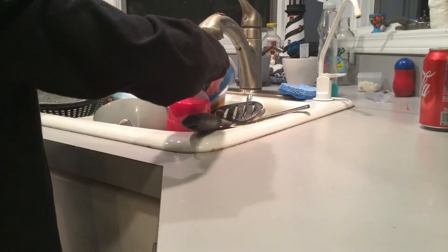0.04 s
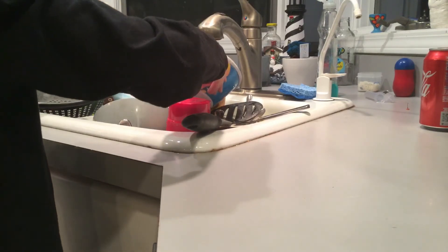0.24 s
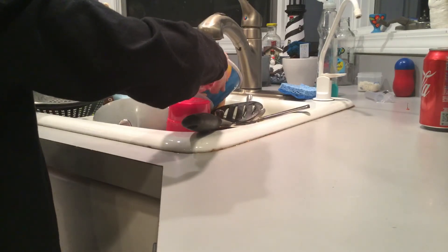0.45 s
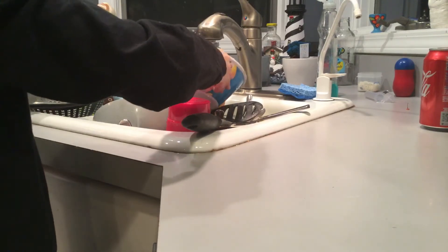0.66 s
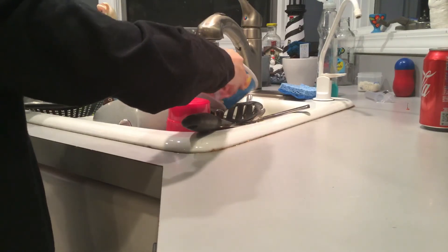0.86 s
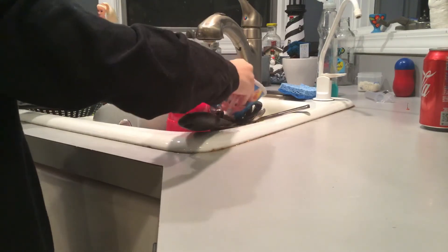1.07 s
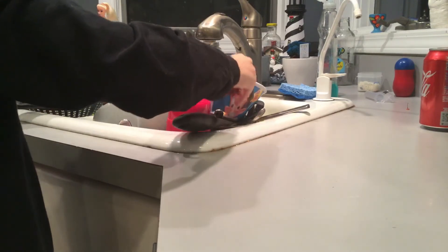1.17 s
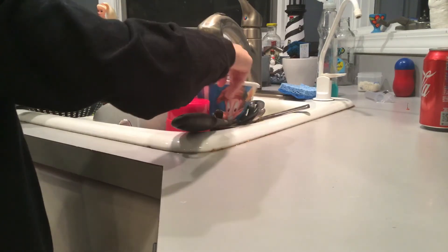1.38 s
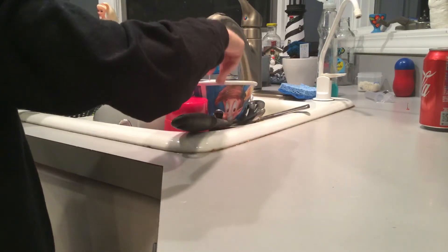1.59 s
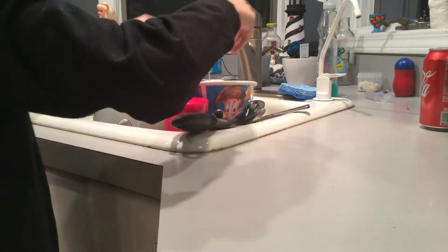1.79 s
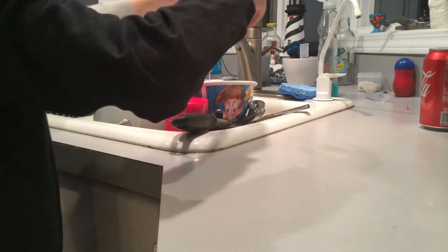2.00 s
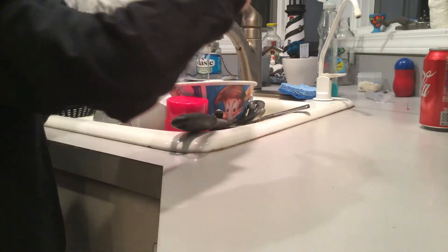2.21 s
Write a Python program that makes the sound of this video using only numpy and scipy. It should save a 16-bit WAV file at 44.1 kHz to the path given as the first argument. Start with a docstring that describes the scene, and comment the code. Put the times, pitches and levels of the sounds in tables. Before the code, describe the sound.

A dish clacks sharply in a kitchen sink at about 0.2 seconds, the loudest sound, ringing briefly. Faint ticks of slipping edges follow, and utensils clink lightly around 0.8 to 1.1 seconds. From 1.2 seconds a plastic tub rubs along the rim, then settles with hollow, damped thumps around 1.5 to 1.6 seconds. Low hum and hiss continue throughout in the small, hard room, heard from a step away.

```python
"""Low hum, hiss and a few faint ticks in a hard, small kitchen, then one sharp clack: a hand shifts
dishes in the sink. The clack is a dish struck in quick contacts, each a crack plus ringing modes.
Thin edges slip and tick, utensils chatter and clink. A plastic tub rubs along the rim and is set
down with hollow, hand-damped thumps. The microphone is a step away on the counter."""
import sys
import numpy as np
from scipy import signal
from scipy.fft import rfft, irfft
from scipy.io import wavfile
from scipy.ndimage import uniform_filter1d

SR = 44100
rng = np.random.default_rng(int(sys.argv[2]) if len(sys.argv) > 2 else 0)


def transcribe(signal):
    """Save signal, clipped to [-1, 1], as a 16-bit WAV file at the path in sys.argv[1]."""
    frames = np.atleast_2d(signal).T
    limited = np.clip(frames, -1, 1)
    pcm = np.round(limited * 32767).astype(np.int16)
    wavfile.write(sys.argv[1], SR, pcm)


N = 99225
EVENT_SAMPLES, LEAD_SAMPLES = 16384, 512  # one contact; lead-in before its onset
EVENT_T_S = np.maximum(np.arange(EVENT_SAMPLES) - LEAD_SAMPLES, 0) / SR

# Hiss and rumble spectrum: f/Hz, relative density/dB
AIR_SPECTRUM = [(15, -11), (25, 5), (65, 0.5), (172, -8.5), (288, -7), (410, -14.5), (746, -19), (854, -26),
                (3910, -32), (5880, -33.5), (12200, -32), (15200, -34.5), (16500, -45)]
# Hum tones: f/Hz, rms level/dB, level waver/dB, pitch waver/Hz
HUM_TONES = [(54, -63.5, 0.5, 1.17), (123.6, -66.5, 3.5, 6.7)]
# Room decay: f/Hz, t60/s
ROOM_DECAY = [(60, 0.32), (250, 0.23), (1000, 0.53), (3000, 0.53), (6000, 0.41), (10000, 0.21),
              (16000, 0.175)]
# Room echo strength: f/Hz, level/dB
ROOM_LEVELS = [(60, -15), (300, 2.5), (1000, 1), (3000, 2.5), (8000, 0), (16000, 1)]
# Edge slips: t/s, peak level/dB, centre f/Hz, width/oct, t60/s, relative broadband level/dB
EDGE_TICKS = [(0.066, -57, 13100, 0.11, 0.03, -26), (0.093, -52.5, 3700, 0.12, 0.12, -12),
              (0.114, -51.5, 12800, 0.28, 0.038, 7), (0.42, -43.5, 5170, 0.63, 0.029, -24),
              (0.463, -41, 8900, .15, 0.076, -21), (.471, -39, 9200, 0.12, 0.03, -11),
              (0.528, -52, 13200, .4, .05, -8), (0.567, -54, 5850, 0.17, 0.036, -10),
              (0.671, -44.5, 8700, 0.13, 0.064, -8), (0.673, -42, 15020, 0.13, .05, -14),
              (0.702, -39, 9140, 0.097, 0.018, -20), (0.705, -39, 15500, 0.059, 0.04, -2),
              (.800, -50, 15400, .15, 0.044, -26), (0.832, -38, 14700, 0.25, 0.077, -7.5),
              (0.85, -46, 11600, 0.072, 0.14, -20), (0.883, -41, 8550, 0.06, 0.057, -16),
              (0.927, -43, 10800, 0.11, 0.044, -18), (0.931, -40.5, 9400, 0.11, 0.071, -14),
              (0.947, -43, 9200, 0.057, 0.028, -11), (0.951, -49, 5660, 0.26, 0.05, -19),
              (0.991, -34, 9000, 0.12, 0.023, -7), (1.164, -48, 4030, 0.26, .06, -7.5),
              (1.221, -53, 8360, 0.12, 0.033, -9), (1.3, -51, 8200, 0.05, 0.19, -12),
              (1.304, -51, 11800, .1, .12, -10), (1.485, -63, 13600, .2, .06, -17),
              (1.521, -34, 10300, 1, 0.1, -16), (1.822, -55, 10210, 0.23, 0.031, -8),
              (1.785, -58.5, 9180, .12, 0.044, -9.5), (1.878, -56, 12000, .25, 0.069, -10),
              (1.914, -58, 12500, 0.18, 0.047, 0), (2.101, -56.5, 12000, 0.15, 0.032, -31),
              (2.158, -40, 13230, .12, 0.022, -28.5)]
# Tub rubbing the rim: t/s, peak level/dB, centre f/Hz, width/oct, t60/s
RIM_SCRAPES = [(1.225, -46.5, 2100, 1, 0.078), (.931, -46, 1600, 0.72, 0.13),
               (1.275, -44.5, 2840, 0.83, 0.3), (1.2, -51, 2040, 0.29, 0.18), (1.2, -52.5, 3600, 0.1, 0.51),
               (1.42, -57, 3600, .3, 0.66), (1.915, -54.5, 3000, .25, 0.095),
               (1.522, -37, 3690, 0.39, 0.21), (1.60, -41, 617, 0.68, 0.46), (1.75, -59, 1850, 0.19, 0.99)]
# Utensil contacts: t/s, peak level/dB, excitation f/Hz
UTENSIL_HITS = [(0.0149, -58, 2620), (0.84, -50, 4100), (0.854, -43, 3010), (0.861, -54, 3550),
                (.858, -48, 4100), (.875, -46.5, 3050), (0.931, -51, 1350), (0.933, -49, 4100),
                (.943, -56.5, 1340), (0.954, -47, 5250), (0.963, -51, 2950), (0.996, -41.5, 4060),
                (0.996, -43, 3100), (.995, -47, 1470), (1.009, -58.5, 4450), (1.009, -49, 3500),
                (1.042, -52, 3080), (1.043, -58, 1467), (1.054, -57, 3730), (1.083, -55.5, 3130),
                (1.101, -52, 1630), (1.356, -55, 2540), (1.372, -51, 2540), (1.41, -59, 2530),
                (1.454, -60.5, 2500), (1.469, -53, 2480), (1.598, -37, 1760)]
# Utensil modes: f/Hz, relative level/dB, t60/s
UTENSIL_MODES = [(1340, 0, 0.034), (1450, 0, 0.038), (1597, 0, .03), (1800, 0, 0.019), (2525, 0, 0.062),
                 (2957, 0, 0.055), (3057, -3, 0.048), (3560, -4, 0.044), (3650, 0, .04), (4075, 2, 0.017),
                 (4470, -3, 0.048), (5230, 0, 0.03)]
# Tub contacts: t/s, peak level/dB, excitation f/Hz, rattle gain/dB,
# t60/ratio, pitch under grip/ratio, onset detuning/fraction
TUB_HITS = [(.221, -27, 136, -8.5, 0.3, 1.02, 0.14), (.244, -34.5, 340, -14, 1.44, 0.96, 0.11),
            (.30, -41.5, 119.6, -16, 0.66, 0.94, 0.16), (0.383, -46.5, 118, -28, 0.83, 1.1, 0.091),
            (.545, -47, 120, -42, 0.8, 1.26, -0.013), (0.782, -52, 128, -23, 0.53, 1.01, 0.0083),
            (.989, -47, 118, -22, 0.56, 0.87, 0.17), (1.171, -46, 397, -1.5, 0.27, 1.08, 0.055),
            (1.223, -44.5, 503, -5, 0.29, 1.13, -0.0057), (1.271, -35.5, 182, -10, 0.49, 1.006, 0.13),
            (1.3, -46, 297, -6.5, 0.41, .95, 0.036), (1.438, -39, 277, -14, 0.2, 1.02, 0.12),
            (1.4957, -26, 340, -22, 1.55, 0.91, .27), (1.529, -26.5, 346, -12.5, 0.72, 1.1, -0.07),
            (1.536, -36, 140, 0, 0.49, 0.91, 0.041), (1.557, -34.5, 336.4, -7, 0.48, .98, 0.087),
            (1.567, -34, 123, -11, 0.63, 1.1, 0.15), (1.582, -38.5, 400, -10.5, 0.47, 1, 0.019),
            (1.598, -40, 425, -5.5, 0.56, 1.03, -0.00045), (1.62, -38.5, 344, -13.5, 0.25, 1.01, 0.055)]
# Tub modes: f/Hz, relative level/dB, t60/s
TUB_MODES = [(115.6, 1, 0.082), (186, -12.5, 0.21), (277, -13, 0.19), (322, -1.5, 0.16),
             (442.6, -14.5, 0.1), (609, -9.5, 0.15), (770, -12.5, 0.31), (970, -5.5, 0.039),
             (1094, -11.5, .08)]
# Dish contacts: t/s from clack onset, peak level/dB, excitation f/Hz
DISH_HITS = [(0, -18, 10950), (.0005, -27, 1250), (.0026, -16.5, 8500), (.005, -17, 9100),
             (.0062, -17.5, 2120), (.0088, -13.5, 5600), (.009, -16.5, 2100), (0.0172, -16, 2850),
             (.018, -25.5, 650), (.028, -21.5, 4850), (.045, -26, 3100)]
# Dish modes: f/Hz, relative level/dB, t60/s
DISH_MODES = [(930, -0.5, 0.096), (1285, 4, 0.1), (1674, -1.5, 0.059), (2133, -1, 0.035), (2635, -2, 0.082),
              (2935, 0, 0.086), (3130, -0.5, .15), (3720, -3, 0.1005), (3835, -4, .08), (4340, -6, 0.097),
              (4830, 0.5, 0.064), (5330, -4.5, 0.054), (6210, -1, 0.046), (6800, -6, 0.087),
              (7630, -15.5, .1), (9000, 1, 0.057)]


def undb(db):
    """Decibels to gain."""
    return 10 ** (np.asarray(db) / 20)


def lookup(table, hz):
    """Table value at hz, interpolated over log frequency."""
    table_hz, values = np.array(table, float).T
    return np.interp(np.log(np.maximum(hz, 1)), np.log(table_hz), values)


def bell(hz, centre_hz, width_oct):
    """Gaussian gain over log frequency."""
    return np.exp(-.5 * (np.log2(np.maximum(hz, 1) / centre_hz) / width_oct) ** 2)


def colour(x, gain):
    """Filter by gain(f/Hz)."""
    return irfft(rfft(x) * gain(np.fft.rfftfreq(len(x), 1 / SR)), len(x))


def fade(t, t60_s):
    """Decay of 60 dB per t60_s."""
    return np.exp(-np.log(1000) * t / max(t60_s, 1e-3))


def wander(rate_hz):
    """Smooth random drift, unit deviation."""
    span = int(SR / rate_hz)
    steps = np.repeat(rng.standard_normal(N // span + 1), span)
    drift = uniform_filter1d(uniform_filter1d(steps, span), span)[:N]
    return drift / drift.std()


def unit_peak(x):
    """Scale to peak 1."""
    return x / np.abs(x).max()


def add(out, event, onset_s, peak_db):
    """Mix one contact into out."""
    start = round(onset_s * SR) - LEAD_SAMPLES
    event = event[:N - start]
    out[start:start + len(event)] += unit_peak(event) * undb(peak_db)


def ring(modes, centre_hz, width_oct, detune=0., settle_s=0.01335):
    """Decaying modes, strongest near the excitation centre; any onset detuning settles."""
    warped_s = EVENT_T_S + detune * settle_s * (1 - np.exp(-EVENT_T_S / settle_s))
    tone = 0
    for k, (hz, db, t60_s) in enumerate(modes):
        gain = (-1) ** k * undb(db) * bell(hz, centre_hz, width_oct)
        tone += gain * np.sin(2 * np.pi * hz * warped_s) * fade(EVENT_T_S, t60_s)
    return unit_peak(tone)


def burst(gain, t60_s, rise_s, grain_db, hold_s=0.):
    """Spray of micro-contacts through a resonance: rise, hold, decay."""
    grains = rng.standard_normal(EVENT_SAMPLES) * undb(grain_db * rng.exponential(size=EVENT_SAMPLES))
    envelope = (1 - np.exp(-EVENT_T_S / rise_s)) * fade(np.maximum(EVENT_T_S - hold_s, 0), t60_s)
    return unit_peak(colour(grains * envelope, gain))


def air(flicker_db=1.5, rms_above_80hz_db=-59.5):
    """Room hiss and rumble; each octave band flickers slightly."""
    noise = 0
    for hz in 30 * 2 ** np.arange(10.):
        band = colour(rng.standard_normal(N), lambda f: bell(f, hz, .4) * undb(lookup(AIR_SPECTRUM, f)))
        noise += band * undb(flicker_db * wander(rate_hz=8.39))
    return noise * undb(rms_above_80hz_db) / colour(noise, lambda f: f > 80).std()


def hum():
    """Two low tones wavering in level and pitch."""
    out = np.zeros(N)
    for hz, rms_db, waver_db, waver_hz in HUM_TONES:
        amplitude = np.sqrt(2) * undb(rms_db + waver_db * wander(rate_hz=19))
        pitch_hz = hz + waver_hz * wander(rate_hz=6.2)
        out += amplitude * np.sin(2 * np.pi * np.cumsum(pitch_hz) / SR)
    return out


def room_echoes(send, rise_s=0.0028):
    """Dense reflections off hard walls, decaying per half-octave band."""
    t = np.arange(SR) / SR
    tail = 0
    for hz in 60 * 2 ** np.arange(0, 8.5, .5):
        band = colour(rng.standard_normal(SR), lambda f: bell(f, hz, .2))
        t60_s = lookup(ROOM_DECAY, hz)
        unit_energy_decay = fade(t, t60_s) * np.sqrt(2 * np.log(1000) / (SR * t60_s))
        tail += band * unit_energy_decay * undb(lookup(ROOM_LEVELS, hz))
    tail *= 1 - np.exp(-(t / rise_s) ** 2)
    return signal.fftconvolve(send, tail)[:N]


def edge_ticks():
    """Thin edges slip and snap: a bright resonance over broad crackle."""
    out = np.zeros(N)
    for onset_s, peak_db, hz, width_oct, t60_s, broad_db in EDGE_TICKS:
        spectrum = lambda f: bell(f, hz, width_oct) + undb(broad_db) * bell(f, 10000, 0.94)
        tick = burst(spectrum, t60_s, rise_s=0.0011, grain_db=-1, hold_s=0.0096)
        add(out, tick, onset_s, peak_db)
    return out


def rim_scrapes():
    """The tub rubs along the rim: grainy band noise."""
    out = np.zeros(N)
    for onset_s, peak_db, hz, width_oct, t60_s in RIM_SCRAPES:
        scrape = burst(lambda f: bell(f, hz, width_oct), t60_s, rise_s=0.0044, grain_db=2.77)
        add(out, scrape, onset_s, peak_db)
    return out


def utensil_clinks(noise_db=-7.5):
    """Utensils touch: brief chatter drives their modes, over narrowband noise."""
    out = np.zeros(N)
    t = np.arange(2048) / SR
    for onset_s, peak_db, hz in UTENSIL_HITS:
        chatter = rng.standard_normal(len(t)) * fade(t, t60_s=0.033)
        tone = signal.fftconvolve(ring(UTENSIL_MODES, hz, width_oct=0.036), chatter)[:EVENT_SAMPLES]
        noise = burst(lambda f: bell(f, hz, 0.18), t60_s=0.13, rise_s=0.0026, grain_db=0.5)
        add(out, unit_peak(tone) + undb(noise_db) * noise, onset_s, peak_db)
    return out


def tub_thumps(push_s=0.00116, rise_s=0.0024, rattle_hz=824):
    """Soft pushes ring the hollow, hand-damped tub and shake a short rattle loose."""
    out = np.zeros(N)
    push = np.hanning(int(push_s * SR) + 3)
    attack = 1 - np.exp(-EVENT_T_S / rise_s)
    for onset_s, peak_db, hz, rattle_db, t60_ratio, pitch_ratio, detune in TUB_HITS:
        gripped_modes = [(f * pitch_ratio, db, t60_s * t60_ratio) for f, db, t60_s in TUB_MODES]
        tone = ring(gripped_modes, hz, width_oct=0.79, detune=detune)
        body = np.convolve(tone, push / push.sum())[:EVENT_SAMPLES] * attack
        rattle = burst(lambda f: bell(f, rattle_hz, 0.89), t60_s=0.089, rise_s=0.0029, grain_db=0.75)
        add(out, body + undb(rattle_db) * rattle, onset_s, peak_db)
    return out


def dish_clack(onset_s=0.2166, snap_hz=12600, crack_db=5):
    """A dish knocked hard: a snap at first touch, then a crack and short ring per contact."""
    out = np.zeros(N)
    snap = burst(lambda f: bell(f, snap_hz, 0.54), t60_s=0.0055, rise_s=5e-5, grain_db=0)
    add(out, snap, onset_s, peak_db=-10)
    for delay_s, peak_db, hz in DISH_HITS:
        crack = burst(lambda f: bell(f, hz, 0.66), t60_s=0.031, rise_s=1e-4, grain_db=4.3)
        tone = ring(DISH_MODES, hz, width_oct=0.63)
        add(out, tone + undb(crack_db) * crack, onset_s + delay_s, peak_db)
    return out


def scene():
    """Mono mix of contacts, echoes and background."""
    contacts = np.array([dish_clack(), edge_ticks() + rim_scrapes(), utensil_clinks(), tub_thumps()])
    send_db = [0, -3.5, -5, -1.5]  # less reaches the room from deep in the basin
    echoes = room_echoes(undb(send_db) @ contacts)
    return (contacts.sum(axis=0) + echoes + air() + hum())[None]


def record(dry, low_cut_hz=45.4, droop_hz=15200, top_cut_hz=16750):
    """Microphone: deep bass cut, treble droop, then a steep top cut."""
    x = signal.sosfilt(signal.butter(6, low_cut_hz, "high", fs=SR, output="sos"), dry)
    x = signal.sosfilt(signal.butter(10, droop_hz, fs=SR, output="sos"), x)
    return signal.sosfilt(signal.ellip(10, .2, 70, top_cut_hz, fs=SR, output="sos"), x)


dry = scene()
out = record(dry)
transcribe(out)
```